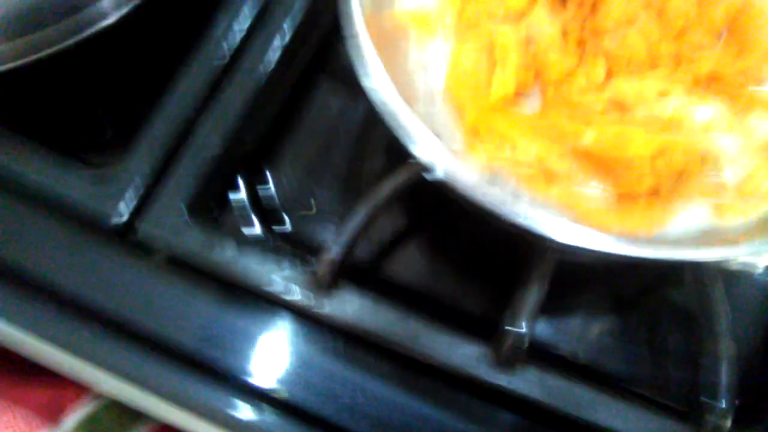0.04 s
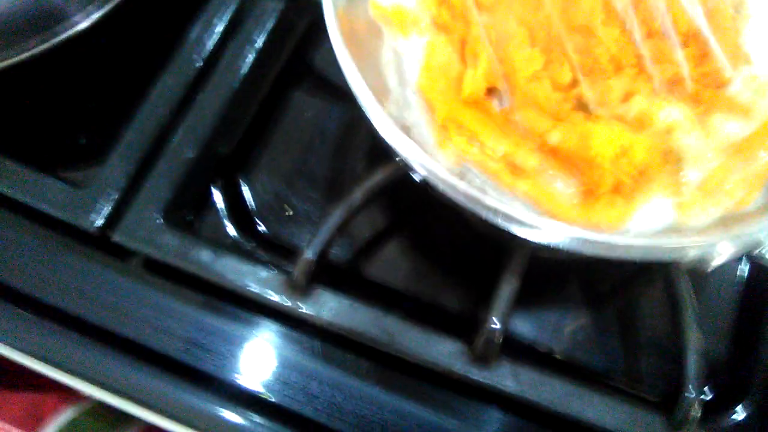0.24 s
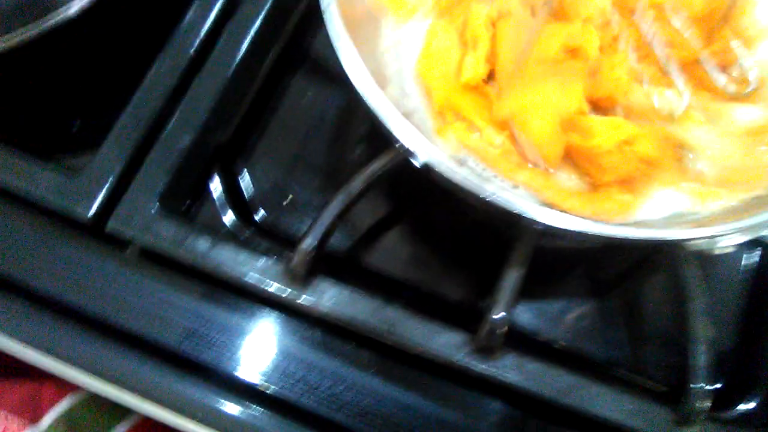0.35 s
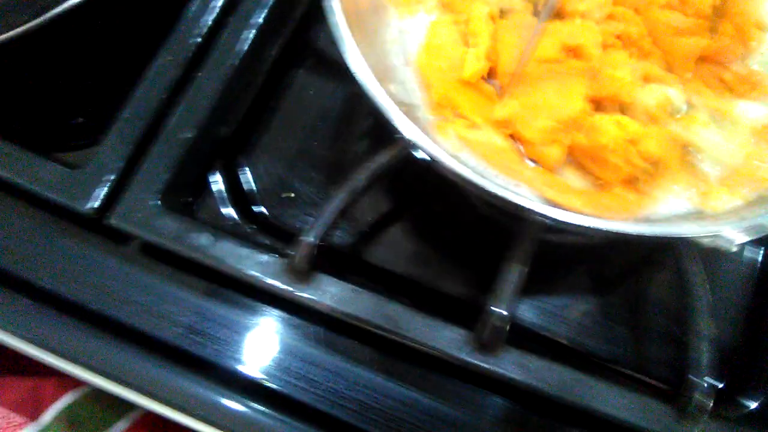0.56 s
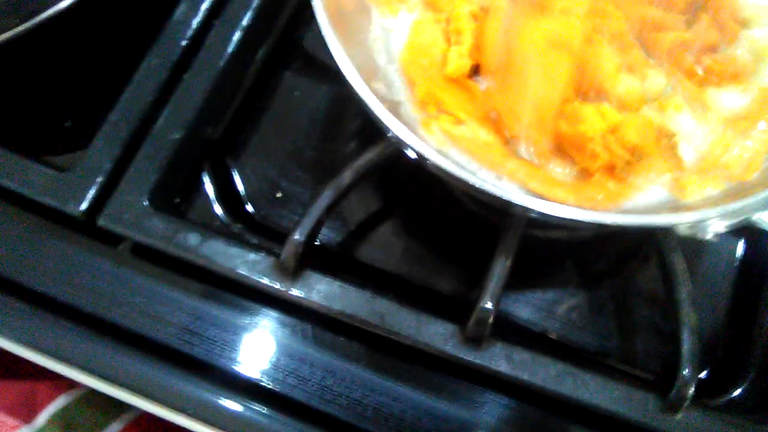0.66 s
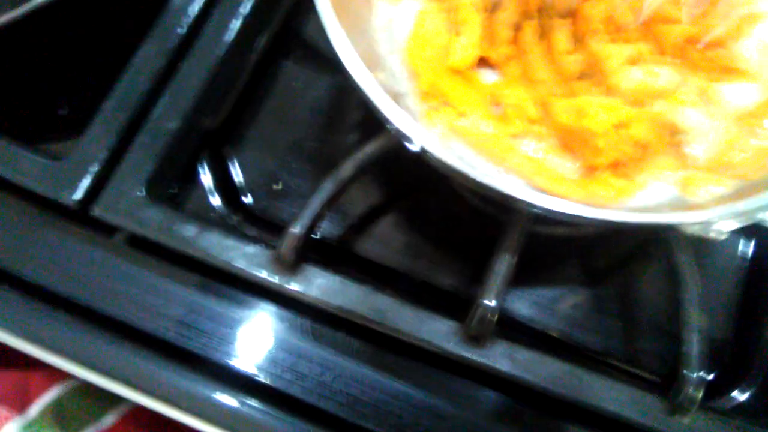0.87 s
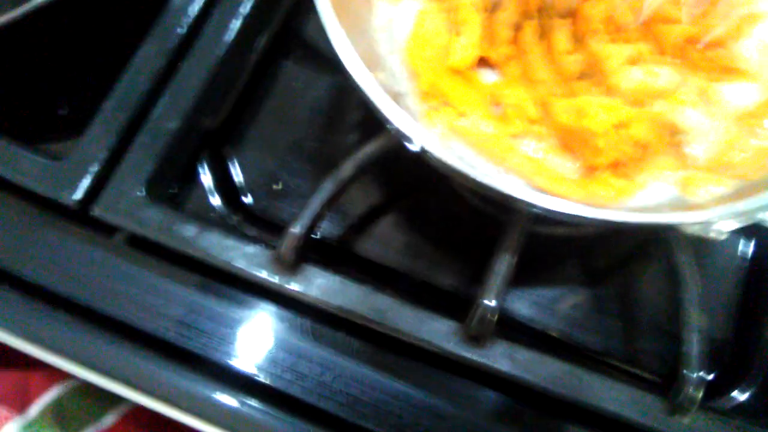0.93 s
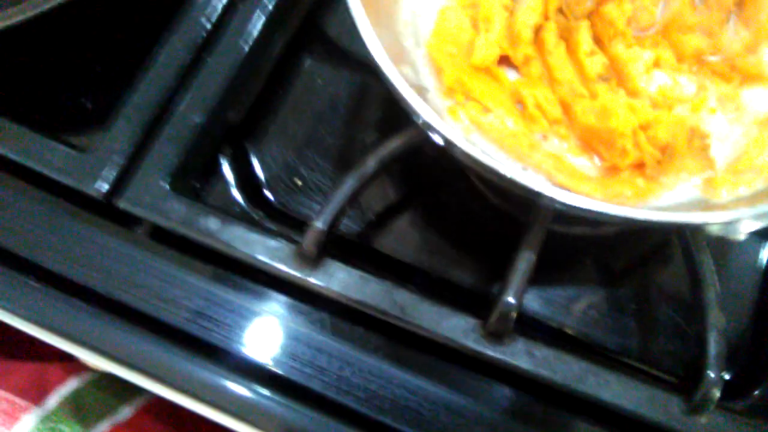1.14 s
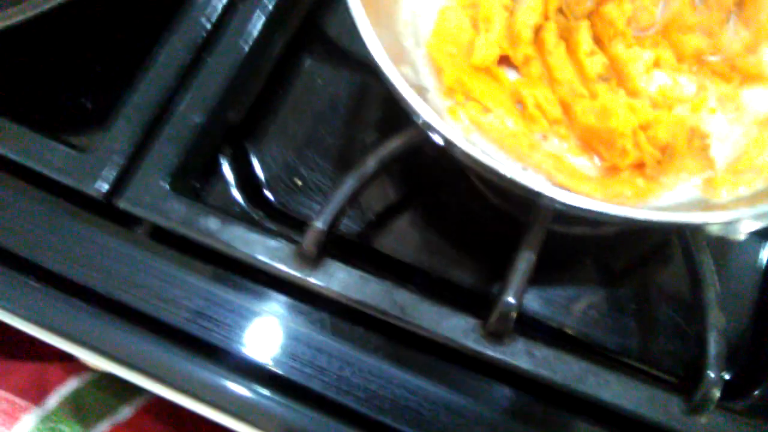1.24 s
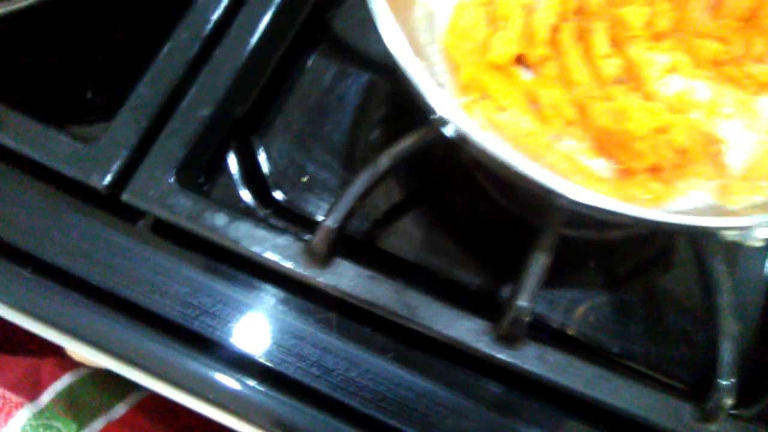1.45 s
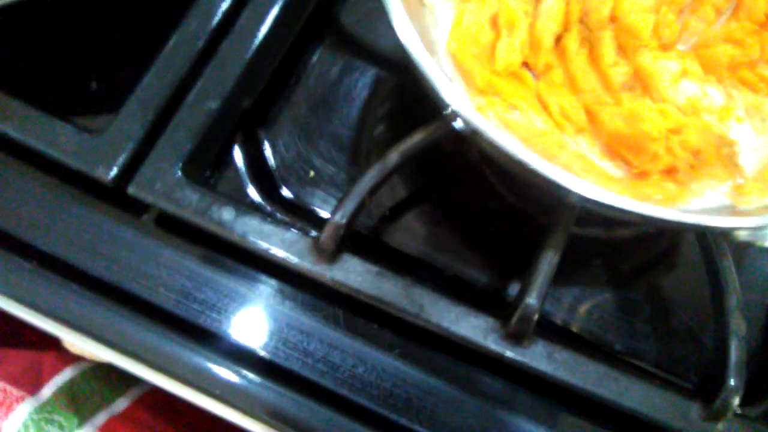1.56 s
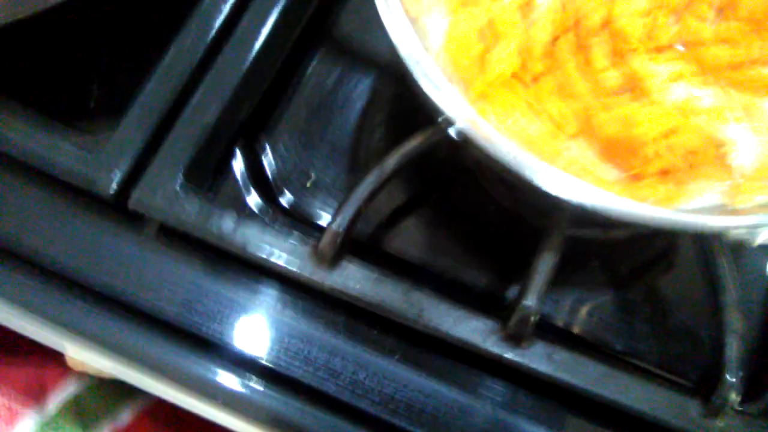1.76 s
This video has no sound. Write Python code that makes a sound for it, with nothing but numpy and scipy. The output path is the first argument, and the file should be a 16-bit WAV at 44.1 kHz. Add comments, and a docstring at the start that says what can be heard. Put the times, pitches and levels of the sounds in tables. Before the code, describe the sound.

Mashing soft food in a metal pan, with close knocks, scrapes and wet smacks.

```python
"""In a small kitchen, close to the microphone, a masher works soft food in a metal pan on a stove grate.
Each downstroke knocks and grinds on the pan bottom, makes the pan ring and shakes the stove.
Air pockets in the mash pop, sticky films smack as they tear, and the wet food crackles.
Between strokes the lifted metal hums faintly. A quiet room rumble lies under it all."""
import sys
import numpy as np
from scipy import signal
from scipy.fft import rfft, irfft
from scipy.io import wavfile

SR = 44100
rng = np.random.default_rng(int(sys.argv[2]) if len(sys.argv) > 2 else 0)


def wav_out(sig):
    """Save sig, one row per channel (or a flat mono array), as 16-bit PCM at SR to the path in sys.argv[1]."""
    wavfile.write(sys.argv[1], SR, np.round(np.clip(np.atleast_2d(sig).T, -1, 1) * 32767).astype(np.int16))


N = 79380
T = np.arange(N) / SR

# The microphone's two openings; balance means left minus right:
# (frequency [Hz], balance [dB], share of unrelated sound [0-1])
MIC_PORTS = [(100, -2, 0.012), (392, -1, 0.049), (1190, -3.5, 0.67), (2080, -6, 0.66), (3200, -7, 1),
             (4000, 4, 1), (5800, 10.5, 1), (7200, 4, 0.6), (9200, -5, 1), (12900, -9, 0.92)]


def amp(db):
    """Turn decibels into a gain."""
    return 10 ** (np.asarray(db) / 20)


def unit(x):
    """Scale a signal to an average power of 1."""
    return x / np.sqrt(np.mean(x ** 2))


def frequencies(size):
    """The frequencies in a spectrum of size samples, never below 1 Hz."""
    return np.maximum(np.fft.rfftfreq(size, 1 / SR), 1)


def along(hz, table, column=1):
    """Read between a table's rows, with frequency spaced in octaves."""
    table = np.array(table, float)
    return np.interp(np.log(hz), np.log(table[:, 0]), table[:, column])


def colour(x, db_of):
    """Filter a sound; db_of gives the gain in dB at each frequency."""
    n = 2 * x.shape[-1]
    cepstrum = irfft(np.log(amp(db_of(frequencies(n)))))
    cepstrum[1:n // 2] *= 2  # folded so the filter rings only after a sound, never before
    cepstrum[n // 2 + 1:] = 0
    return irfft(rfft(x, n) * np.exp(rfft(cepstrum)))[..., :n // 2]


def spread(pair):
    """Send two unrelated signals to left and right, alike in the bass."""
    n = pair.shape[-1]
    share = np.clip(along(frequencies(n), MIC_PORTS, column=2), 0, 1) / 2
    mid, side = rfft(pair) * np.sqrt([1 - share, share])
    return irfft(np.array([mid + side, mid - side]), n)


def noise(size):
    """Stereo white noise."""
    return spread(rng.standard_normal((2, size)))


def burst(t, decay_s, rise_s):
    """A very short puff of noise with a softened start."""
    envelope = np.exp(-t / decay_s) * (1 - np.exp(-(t / rise_s) ** 2))
    x = noise(len(t)) * envelope
    for _ in range(3):  # even out the spectrum while keeping the puff short
        x = irfft(np.exp(1j * np.angle(rfft(x)))) * np.sqrt(envelope)
    return x * np.sqrt(2 * np.sum(envelope ** 2) / np.sum(x ** 2))


def ring(modes, t, scatter=0):
    """An object's own tones (modes), each fading by 60 dB in its ring time; scatter blurs their phases."""
    out = 0
    for hz, db, ring_s in modes:
        phase = rng.standard_normal((2, 1)) * along(hz, MIC_PORTS, column=2) * 1.44
        phase += scatter * rng.standard_normal()
        out = out + amp(db) * np.exp(-np.log(1000) * t / ring_s) * np.sin(2 * np.pi * hz * t + phase)
    return out


def grains(per_s, scatter_db):
    """Random clicks of uneven size."""
    sizes = amp(scatter_db * np.minimum(rng.exponential(size=(2, N)), 2))
    signs = rng.choice([-1, 1], (2, N))
    return spread(sizes * signs * (rng.random((2, N)) < per_s / SR))


def add(out, start_s, x, balance_db=0):
    """Mix a sound in at a time and a left-right position."""
    i = max(int(start_s * SR), 0)
    out[:, i:i + x.shape[-1]] += (x * amp([[balance_db / 2], [-balance_db / 2]]))[:, :N - i]


def room_rumble():
    """The quiet, steady rumble of the room."""
    # The rumble's tone: (frequency [Hz], level [dB])
    rumble_tone = [(25, 5.5), (60, -19), (170, 5), (400, -25.5), (1000, -16.5), (2200, -74.5),
                   (4000, -46.5), (14000, -36)]
    return amp(-53) * unit(colour(noise(N), lambda f: along(f, rumble_tone)))


def kitchen_echo(x, size=32768):
    """Sound bounces off the stove and wall, then dies away in the room, the treble first."""
    # The room's echo, band by band: (frequency [Hz], level [dB], ring time [s])
    bands = [(60, -6, 1), (170, -5, 0.59), (342, -7.5, 1), (830, -16.5, 1), (2183, -12.5, 0.41),
             (4000, -16.5, 0.43), (6200, -21.5, 0.6), (8450, -18, 0.15), (14000, -29.5, .3)]
    t = T[:size]
    spectrum, tail = rfft(noise(size)), 0
    fade_in = np.clip((t - 0.004) / 0.00573, 0, 1)
    for hz, db, ring_s in bands:
        band = along(frequencies(size), [(row[0], row[0] == hz) for row in bands])
        envelope = np.exp(-np.log(1000) * t / ring_s) * fade_in
        tail = tail + amp(db) * irfft(spectrum * band) * envelope / np.linalg.norm(envelope)
    early = noise(size) * np.exp(-t / 0.0044) * (t > 0.002)
    early = amp(-10) * unit(early) / np.sqrt(size)
    early = colour(early, lambda f: along(f, [(6500, -2.5), (9500, 5.5)]))
    return x + signal.fftconvolve(x, tail + early, axes=1)[:, :N]


def metal_hum(hz=802):
    """The lifted metal is free to ring with one faint tone."""
    # Spells of humming: (start [s], end [s], level [dB])
    spells = [(0.033, 0.216, -56.5), (1.178, 1.262, -56), (1.722, 1.803, -60.5)]
    envelope = 0
    for start, end, db in spells:
        envelope += amp(db) * np.clip(np.minimum(T - start, end + 0.0044 - T) / 0.0034, 0, 1)
    return np.sqrt(2) * envelope * np.sin(2 * np.pi * hz * T)


def air_pops(size=1024):
    """Each bursting air pocket rings briefly, rising in pitch as it opens."""
    # Air pockets in the mash: (time [s], level [dB], pitch [Hz], length [s], balance [dB])
    pockets = [(0.0444, -20, 2600, 0.0019, 0.5), (.2468, -15, 1860, 0.005, -1.5),
               (0.2877, -15.5, 1916, 0.0046, -1), (.2880, -15.5, 2930, 0.0033, 9),
               (0.2915, -15, 2510, 0.0072, 3), (0.2997, -17, 2870, 0.0043, -2),
               (.4280, -11.5, 1353, 0.004, 0.5), (0.4286, -11, 3200, 0.0032, 5.5),
               (0.4355, -13.5, 1870, 0.0034, -7), (0.5457, -34, 3770, .004, -5),
               (0.6295, -27.5, 2510, 0.0026, 5), (0.642, -30.5, 5200, 0.0027, 0),
               (0.655, -24.5, 2996, 0.0033, 1), (0.7104, -30.5, 2272, 0.0026, -3),
               (0.7838, -32.5, 2300, 0.0035, -5), (0.8434, -39.5, 2250, 0.0037, -6),
               (.8870, -50, 2007, 0.0063, -5.5), (1.1741, -26, 2466, 0.0032, -5),
               (1.1874, -29.5, 5950, 0.0042, -2.5), (1.2018, -19.5, 6350, 0.0011, -1.5),
               (1.274, -16, 4100, 0.0025, 2.5), (1.2966, -20, 1125, 0.0058, 2),
               (1.309, -19.5, 2260, 0.007, 5), (1.387, -36.5, 2400, 0.0062, -6),
               (1.5449, -26, 1077, 0.0056, 1.5), (1.5454, -19.5, 5240, 0.0033, -5),
               (1.727, -26.5, 2450, 0.0022, -2)]
    out = np.zeros((2, N))
    for start, db, hz, length, balance_db in pockets:
        progress = T[:size] / length
        pitch = hz * (1 + 0.17 * (np.minimum(progress, 2) - 0.5))
        phase = 2 * np.pi * np.cumsum(pitch) / SR
        overtone = amp(-20.5) * np.sin(1.68 * phase)
        envelope = progress ** 2 * np.exp(-5.5 * progress)
        add(out, start, amp(db) * envelope / envelope.max() * (np.sin(phase) + overtone), balance_db)
    return out


def wet_smacks(size=1024, slide_s_per_octave=0.0022):
    """Sticky films tear from the masher: bright clicks that slide down as the gap widens."""
    # Tearing films: (time [s], level [dB], centre frequency [Hz], decay [s], balance [dB])
    films = [(0.0434, -17.5, 5000, .0016, 8.5), (0.0853, -9.5, 6130, 0.0016, -3.5),
             (0.1216, -21, 5300, .0008, 1), (0.5431, -17, 5640, 0.00041, 3), (0.6287, -15, 6700, .0018, 0),
             (0.9608, -11, 4860, 0.0017, -1), (0.9783, -15, 8350, 0.00025, 10),
             (0.9968, -13.5, 7200, 0.0014, 2), (1.097, -30, 6700, 0.0014, 3.5),
             (1.145, -27, 6200, 0.00084, 1), (1.173, -19.5, 5440, 0.0013, -2),
             (1.1887, -8, 8130, 0.00055, -0.5), (1.1983, -25, 9400, .0004, -9),
             (1.202, -8.5, 7600, 0.00039, -5), (1.272, 2, 6300, 0.00095, -7),
             (1.4676, -20.5, 5800, 0.00082, 13), (1.518, -32, 11360, 0.00073, -9),
             (1.54, -23, 5240, 0.00046, -4), (1.5458, -9, 6900, 0.0013, -7.5),
             (1.6185, -21.5, 6200, 0.00055, 1), (1.7255, -20.5, 5090, .0012, 4.5),
             (1.7643, -22, 9300, 0.0011, -7), (1.7851, -19, 7000, 0.00088, -2)]
    out = np.zeros((2, N))
    delay_s = slide_s_per_octave * np.clip(np.log2(7000 / frequencies(size)), 0, 1)
    slide = np.exp(-2j * np.pi * np.cumsum(delay_s) * SR / size)  # lower tones come later
    for start, db, hz, decay_s, balance_db in films:
        click = irfft(rfft(burst(T[:size], decay_s, decay_s / 2)) * slide)
        peak = lambda f: -21.5 * (1 - np.exp(-(np.log2(f / hz) / 0.68) ** 2))
        bass_cut = lambda f: 10 * np.minimum(np.log2(f / 1800), 0)
        add(out, start, amp(db - 0.5) * colour(click, lambda f: peak(f) + bass_cut(f)), balance_db)
    return out


def masher_drags(attack_s=0.00043, release_s=0.021):
    """As the masher moves, metal grinds on metal, the mash crackles and the pan rocks on the grate."""
    # Drags through the mash: (start [s], length [s], grinding [dB], crackle [dB], rocking [dB])
    drags = [(.0, 0.096, -47.5, -59, -41), (0.26, 0.071, -25.5, -24, -30.5), (0.374, 0.12, -38, -75, -41),
             (0.62, 0.046, -47.5, -43, -46), (0.954, 0.058, -69, -60, -45),
             (1.178, 0.015, -43, -43.5, -46.5), (1.266, 0.069, -30, -38, -44),
             (1.455, 0.17, -83, -59, -48.5), (1.723, 0.036, -53, -52, -42)]
    # The tone of grinding metal: (frequency [Hz], level [dB])
    grind_tone = [(60, 6), (280, 5.5), (650, -2), (1100, -3), (2000, -4), (3000, -1), (4300, -11),
                  (6300, -5), (8000, -14), (14000, -43)]
    # The tone of wet crackle: (frequency [Hz], level [dB])
    crackle_tone = [(500, -22), (2000, 10.5), (6500, 6.5), (9000, -12), (12000, -10.5), (15000, -21)]
    # The tone of the rocking pan: (frequency [Hz], level [dB])
    rock_tone = [(12, -11.0), (28, 15), (70, 12.5), (170, -3.5), (320, -9.5), (900, -33.5), (4000, -111)]
    grind = unit(colour(grains(per_s=5000, scatter_db=10), lambda f: along(f, grind_tone)))
    crackle = unit(colour(grains(per_s=340, scatter_db=8), lambda f: along(f, crackle_tone)))
    rock = unit(colour(noise(N), lambda f: along(f, rock_tone)))
    out = np.zeros((2, N))
    for start, length, grind_db, crackle_db, rock_db in drags:
        fade_in = np.clip((T - start) / attack_s, 0, 1)
        fade_out = np.exp(-np.maximum(T - start - length, 0) / release_s)
        out += fade_in * fade_out * (amp(grind_db) * grind + amp(crackle_db) * crackle + amp(rock_db) * rock)
    return out


def pan_wall(x, count=110, size=8192, ring_s=0.053):
    """Sounds in the pan set its wall ringing with many closely spaced high tones."""
    pitches = 1650 + 5200 * (np.arange(count) + rng.random(count)) / count
    response = ring([(hz, 0, ring_s) for hz in pitches], T[:size], scatter=np.pi)
    return x + amp(-7.5) * signal.fftconvolve(x, unit(response) / np.sqrt(size), axes=1)[:, :N]


def masher_knocks(size=4096, ring_size=26000):
    """The masher hits with a crack and a rattle; its wire and the pan ring, and the stove thuds below."""
    # Hits on the pan: (time [s], level [dB], thud against that level [dB], thud pitch [Hz],
    # contact pitch [Hz], boost at that pitch [dB], treble tilt [dB per octave], balance [dB])
    hits = [(0.0455, -28, 12.5, 165, 2970, 3.5, -5.5, -6.5), (0.2469, -3.5, -13, 268, 1844, 2, 0.5, 0),
            (0.2483, -7, 9.5, 274, 4830, 5, -7.5, 0.5), (0.2889, -7, 5.5, 170, 2230, -15, -2, -8),
            (0.2994, -11.5, 2.5, 204, 3020, -3, 0, 5), (0.32, -8, -8, 248, 6200, 10.5, -3, -5.5),
            (0.3328, -14, -1, 202, 5800, 9, -7, -4), (0.36, -15.5, -22, 203, 6200, 7, -5, -1),
            (0.4278, -6.5, 2.5, 211, 1355, 6.5, 1.5, -2.5), (.4300, -9.5, 0, 237, 3400, 6.5, -4.5, 6),
            (0.4418, -18.5, -7.5, 217, 1846, 17, -6.5, 3), (0.6545, -23, 3, 189, 1618, 15, -5.5, 2.5),
            (0.7188, -33.5, 12.5, 179.4, 1680, 12, -9, -2.5), (0.966, -22, 8, 356, 1715, 10, -3.5, 1.5),
            (.9970, -25, -14, 256, 6150, -19.5, -1.5, -3.5), (1.177, -41.5, 22, 164, 2510, 12, -1.5, -4),
            (1.2678, -7.5, -9.5, 307, 1972, 3.5, -1.5, -2), (1.2728, -13.5, 10.5, 303, 4800, 3, 1.5, -4),
            (1.2974, -6.5, -4.5, 188, 1017, 0.5, -1, 1.5), (1.4027, -22.5, -11, 221, 1910, 6, -5, 0.5),
            (1.467, -27, 7, 209, 4000, 8.5, -3, -0.5), (1.5451, -14, 2, 312, 1045, 0, -1.5, 1),
            (1.6646, -21, 0, 234, 1890, 8.5, -2.5, 1.5), (1.734, -40, 18.5, 196, 838, 18.5, -6, -3.5)]
    # The tone of metal hitting metal: (frequency [Hz], level [dB])
    contact_tone = [(60, -17.5), (300, -4), (650, -15), (1100, -4.5), (2000, -3.5), (3200, 2), (4500, 0.5),
                    (6300, 4), (8000, -2), (11000, -11), (15000, -24)]
    # The pan's tones, damped by the food: (frequency [Hz], level [dB], ring time [s])
    pan_modes = [(933, 2.5, 0.055), (1208.6, -4.5, 0.25), (1540, -10, 0.25), (1803, -6, 0.1),
                 (1944, 0, 0.051), (2200, -10.5, .12), (2600, -3, 0.07), (2874, 1.5, 0.15),
                 (3245, -10, .14), (3470, -1.5, 0.065), (5200, -13, 0.21), (5830, -18, 0.42),
                 (7160, -0.5, 0.062)]
    # The tones of the masher's wire: (multiple of the contact pitch [ratio], level [dB])
    wire_modes = [(1, 0), (1.9, -14), (2.85, -10)]
    # The tones of the grate and stove top: (frequency [Hz], level [dB], ring time [s])
    stove_modes = [(96.1, -1.5, 0.55), (162.7, -1, 0.57), (169.35, 7, 0.24), (253.8, -12, 0.92),
                   (294.2, 6, 0.14), (317.6, 1, 0.14), (408.7, -2.5, 0.18), (466, 3, 0.12),
                   (742, -5.5, 0.32), (860, -10.5, 0.86)]
    out, t, long_t = np.zeros((2, N)), T[:size], T[:ring_size]
    stove_rise = 1 - np.exp(-long_t / 0.0047)
    for start, db, thud_db, thud_hz, hz, boost_db, tilt, balance_db in hits:
        peak = lambda f: boost_db * np.exp(-(np.log2(f / hz) / 0.33) ** 2)
        tone = lambda f: peak(f) + tilt * np.log2(np.maximum(f, 700) / 3000)
        crack = amp(-1) * burst(t, decay_s=0.003, rise_s=0.00056)  # the food softens the start
        rattle = amp(-16) * noise(size) * np.exp(-t / 0.018)
        contact = colour(crack + rattle, lambda f: along(f, contact_tone) + tone(f))
        add(out, start, amp(db) * contact, balance_db)
        pan = [(f, level + tone(f), ring_s) for f, level, ring_s in pan_modes]
        add(out, start, amp(db - 30) * ring(pan, long_t), balance_db)
        wire = [(k * hz, level, 0.06 * 1800 / hz) for k, level in wire_modes if k * hz < SR / 4]
        add(out, start, amp(db + boost_db - 18) * ring(wire, t) / 2, balance_db)
        thump = ring([(thud_hz, db + thud_db - 30.5, 0.1)], t)
        add(out, start, thump * stove_rise[:size])
        # Stove tones far from the thud's pitch are shaken less.
        stove = [(f, level - 10 * (np.log2(f / thud_hz) / 0.91) ** 2, ring_s)
                 for f, level, ring_s in stove_modes]
        add(out, start, amp(db + thud_db - 26) * ring(stove, long_t) * stove_rise)
    return out


def scene():
    """Pan and mash echo in the kitchen, over the hum and the rumble."""
    rumble = room_rumble()
    pan = pan_wall(masher_knocks() + wet_smacks() + masher_drags())
    return kitchen_echo(pan + air_pops()) + metal_hum() + rumble


def record(dry, top_hz=14400):
    """Each microphone opening has its own tone; peaks are clipped and the highest treble is cut."""
    lean_db = along(frequencies(2 * N), MIC_PORTS) / 2
    x = irfft(rfft(dry, 2 * N) * amp([lean_db, -lean_db]))[:, :N]
    low_pass = signal.ellip(8, 0.2, 70, top_hz, fs=SR, output="sos")
    return signal.sosfilt(low_pass, np.clip(x, -1, 1))


dry = scene()
out = record(dry)
wav_out(out)
```